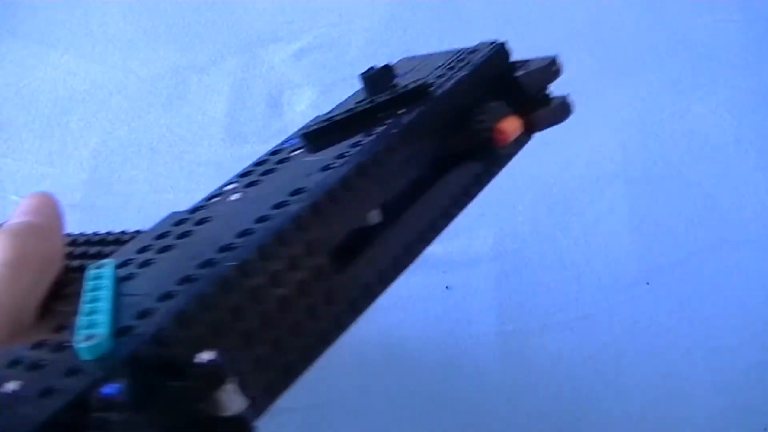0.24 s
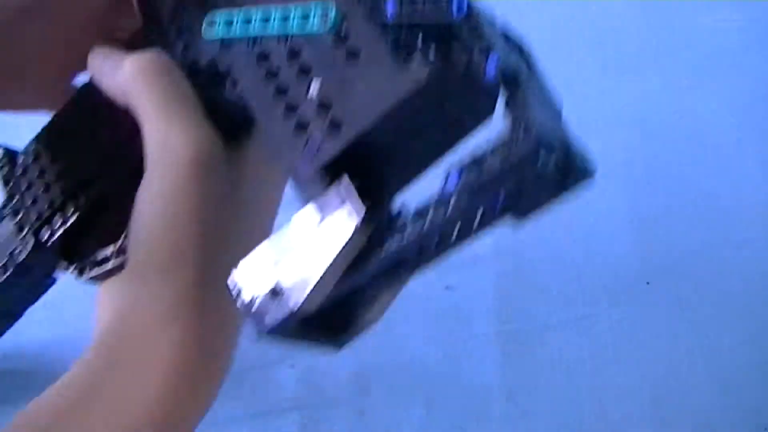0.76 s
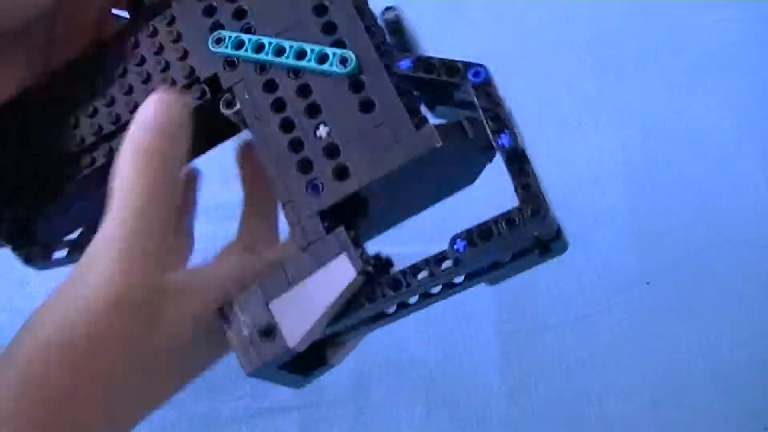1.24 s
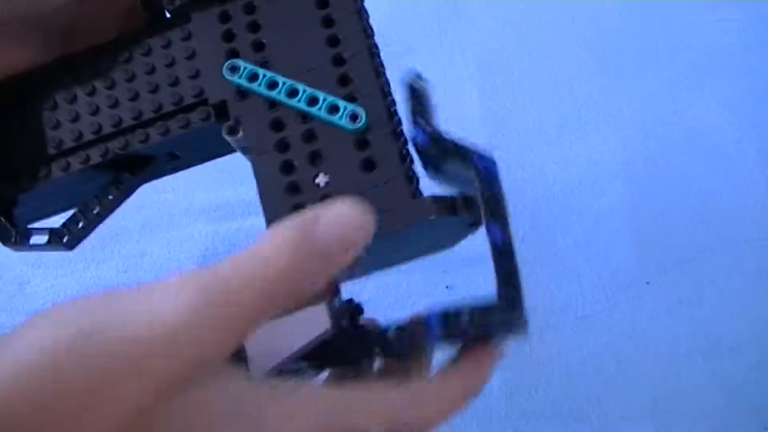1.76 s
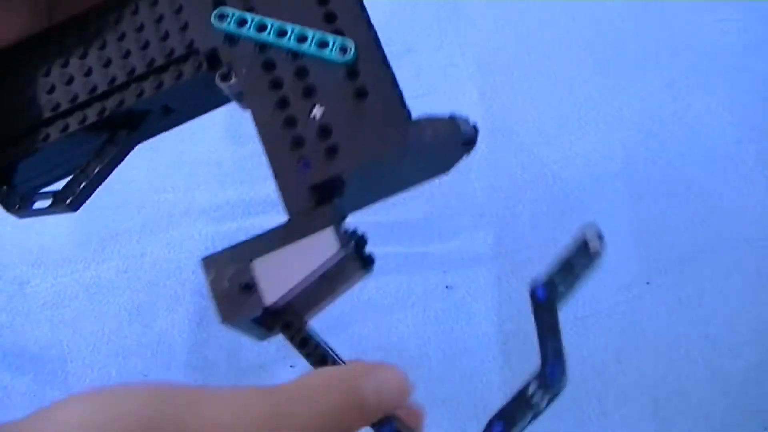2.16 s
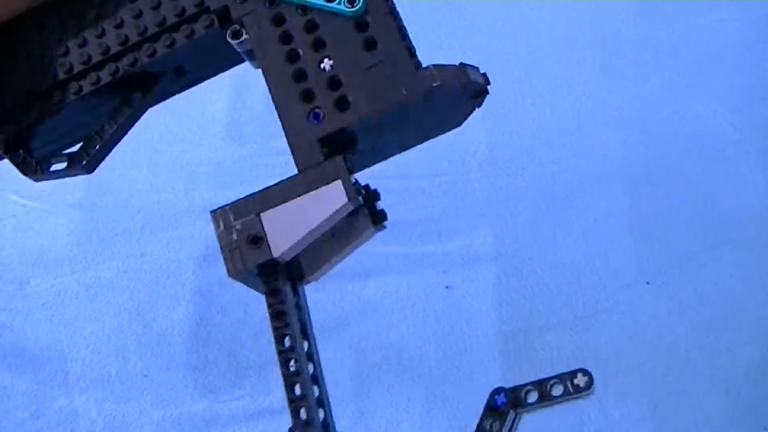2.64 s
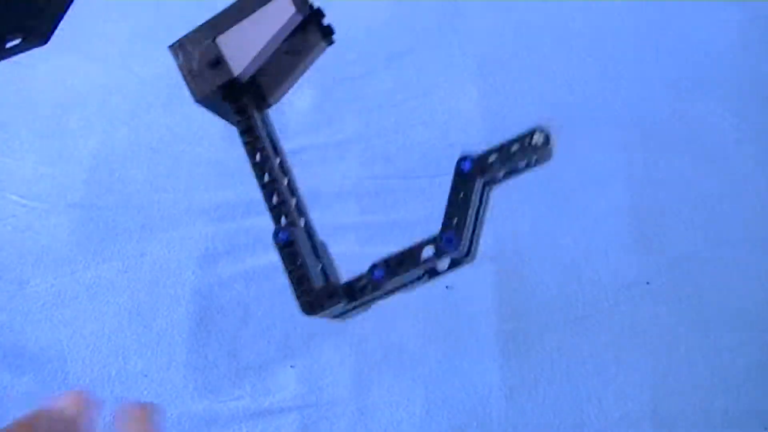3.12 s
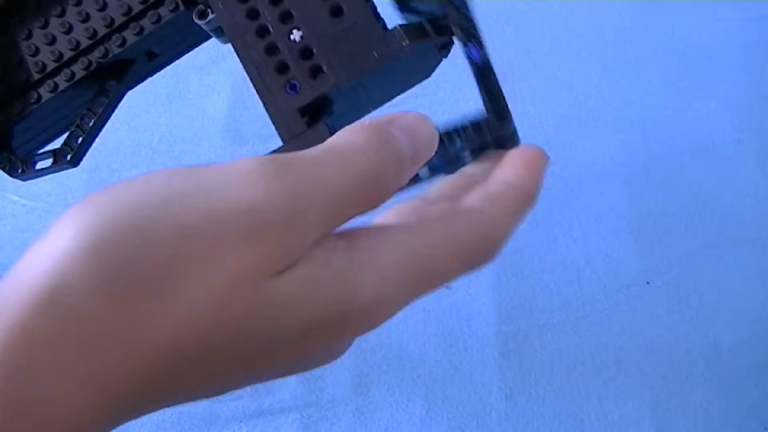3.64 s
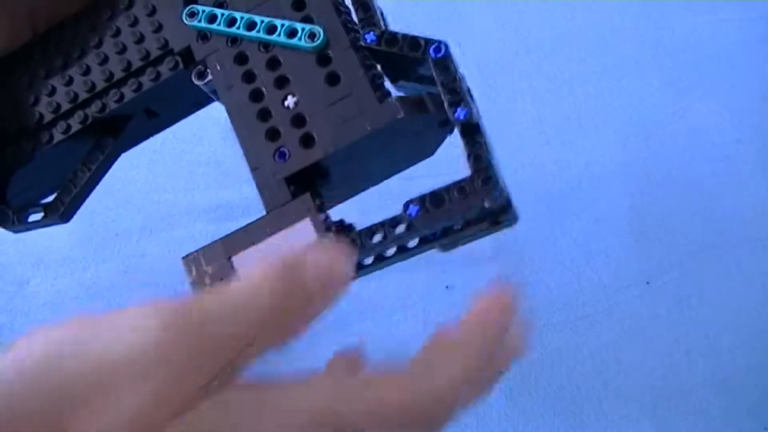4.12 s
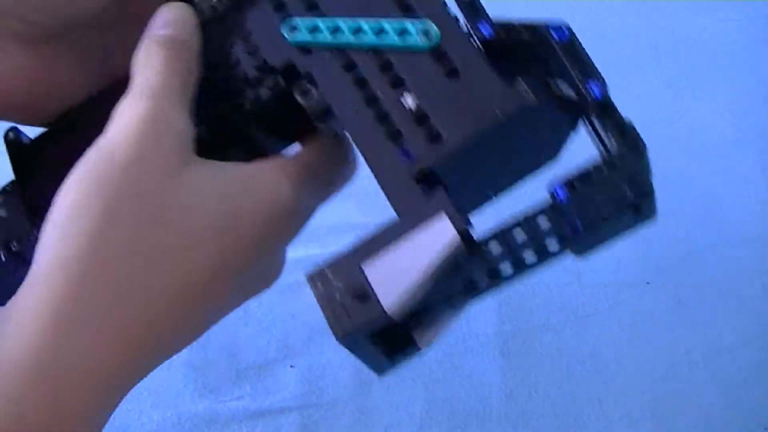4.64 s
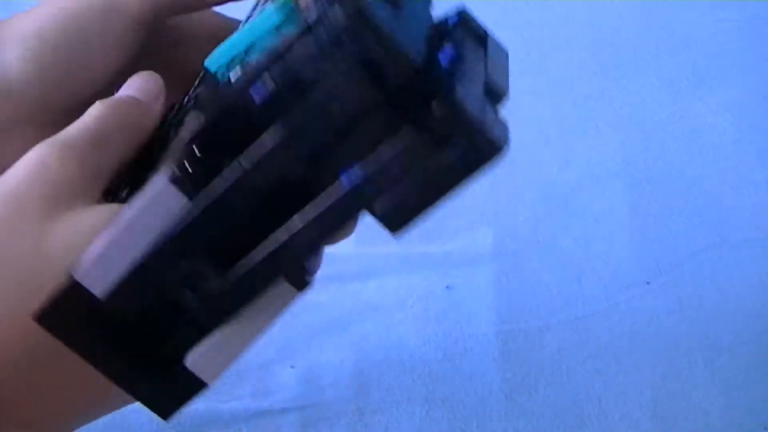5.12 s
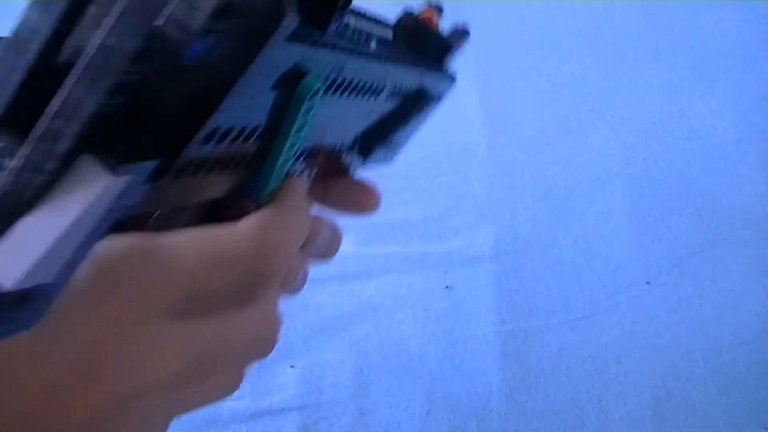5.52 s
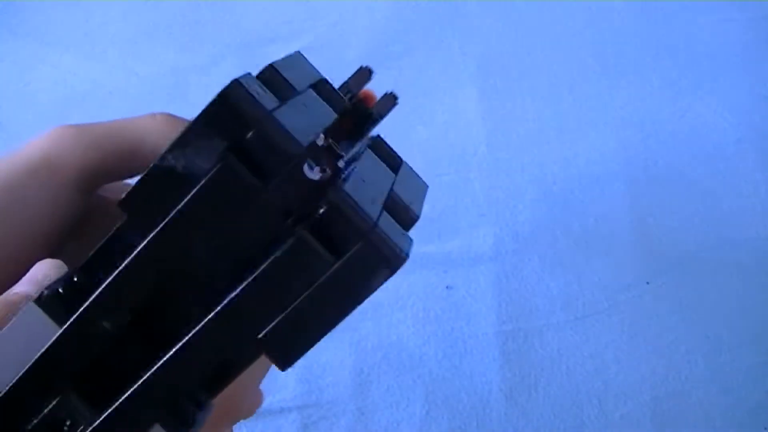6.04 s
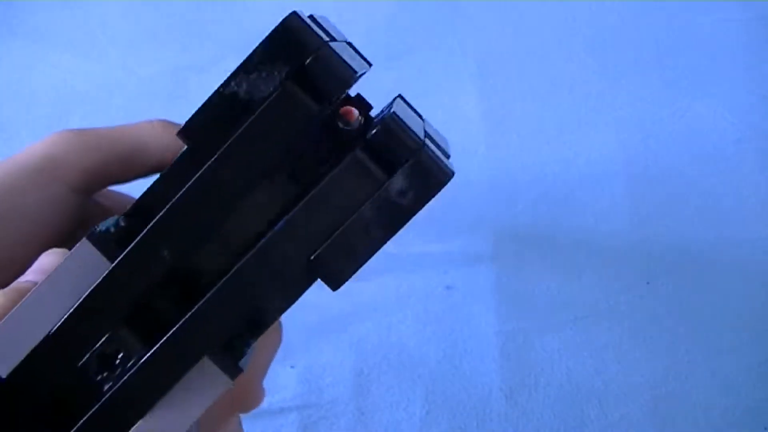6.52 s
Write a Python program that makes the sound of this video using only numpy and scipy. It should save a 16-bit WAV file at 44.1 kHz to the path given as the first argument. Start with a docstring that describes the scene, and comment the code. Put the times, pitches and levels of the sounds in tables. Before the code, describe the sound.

Plastic toy bricks click and rattle irregularly as a built model is turned in the hands, with soft finger rubbing in a quiet room.

```python
"""A quiet room: a model of plastic bricks is turned over in the hands, close to a small microphone.
Loose bricks and a hinged arm knock, ringing shell, beams, studs and edges; the joints rattle and creak,
and the model recoils with a dull thump under heavy knocks. Fingers slide over the studs in dense
friction grains. The room hisses; a distant cricket trills now and then with its wings."""
import sys
import numpy as np
from scipy import signal
from scipy.fft import rfft, irfft
from scipy.io import wavfile

SR = 44100
rng = np.random.default_rng(int(sys.argv[2]) if len(sys.argv) > 2 else 0)


def dump_mix(stems):
    """Bounce the given channels to the path in sys.argv[1] as a 16-bit WAV at rate SR."""
    frames = np.atleast_2d(stems).T  # one column per channel
    limited = np.clip(frames, -1, 1)  # hard clip at full scale
    pcm = np.round(limited * 32767).astype(np.int16)
    wavfile.write(sys.argv[1], SR, pcm)


N = 298557

# knocks: t/s, body level/dB, tick level/dB, loose brick f/Hz, chatter decay/ms
KNOCKS = [(0.0094, -28.5, -42, 1400, 3.4), (0.0202, -36, -40, 1900, 2.1), (0.7098, -36, -44.5, 1580, 2.6),
          (0.839, -29, -34, 2420, 1.4), (0.8558, -28, -38, 1440, 2), (0.885, -40, -43.5, 1920, 1.9),
          (0.9113, -32, -46, 1700, 1.9), (0.9278, -31.5, -57, 2007, 1.1), (1.0306, -16, -28.5, 1816, 1.9),
          (1.0405, -25.5, -29, 1270, 2.4), (1.0528, -20.5, -20, 2240, 5.7), (1.057, -15, -19.5, 2440, 1.5),
          (1.1025, -11, -13.5, 1260, 1.4), (1.1332, -29.5, -55, 1440, 1.9), (1.206, -33, -56, 1120, 1.7),
          (1.2358, -26, -44.5, 1170, 2.1), (1.289, -19.5, -25.5, 2270, 3.1), (1.302, -38, -44, 1520, 1.9),
          (1.3213, -24.5, -32, 1970, 2.5), (1.3389, -21.5, -18, 2410, 3.8), (1.3444, -18, -20.5, 2440, 2),
          (1.3601, -20, -29, 1100, 1.4), (1.376, -17.5, -34, 3030, 3.3), (1.4205, -19, -39, 1304, 1.3),
          (1.4547, -47, -39.5, 1970, 2.1), (1.4959, -40, -32.5, 1130, 1.9), (1.516, -18, -36.5, 1600, 2.7),
          (1.5454, -44, -36, 2130, 1.7), (1.5562, -22, -39.5, 1256, 1.6), (1.5673, -54, -36.5, 1320, 2.1),
          (1.5864, -47, -42.5, 1650, 1.9), (1.7456, -32.5, -53, 1320, 2.3), (1.8554, -37, -28, 3450, 1.6),
          (1.9024, -22.5, -31, 2520, 4), (1.9192, -25, -49, 1310, 1.9), (2.0447, -29, -39, 2940, 3.5),
          (2.0742, -41, -45, 1360, 1.9), (2.1036, -46, -40, 3670, 2.1), (2.1276, -28, -43, 2080, 1.9),
          (2.136, -20, -25.5, 2019, 2.6), (2.142, -15, -20.5, 2800, 2.5), (2.1562, -25, -40, 2780, 2.2),
          (2.4167, -31, -32, 3330, 3.3), (2.425, -26.5, -22.5, 3860, 2.6), (2.4427, -51, -33, 3700, 1.9),
          (2.5342, -28, -51, 1330, 1.5), (3.4294, -35, -38, 2400, 1.5), (3.6599, -17, -21, 1930, 3.2),
          (3.6636, -16, -43, 2496, 1.7), (3.67, -16, -35, 2700, 1.1), (3.7172, -35, -45, 1130, 3.3),
          (3.7237, -25, -51, 1200, 2.4), (3.7315, -27, -49, 1110, 2.6), (3.8337, -26.5, -38.5, 2870, 1.3),
          (3.8354, -24.5, -38.5, 2500, 3.8), (3.9994, -36, -37.5, 2560, 2.3),
          (4.1819, -35, -37.5, 2700, 2.4), (4.2364, -42.5, -58, 1150, 2.4), (4.5211, -39.5, -52, 1430, 1.6),
          (4.575, -42, -56, 1490, 1.9), (4.6138, -30, -52, 1290, 2.7), (4.6488, -41, -55, 1390, 2.1),
          (4.6868, -40.5, -52.5, 1970, 2.1), (4.7038, -39, -58, 1400, 1.9), (4.8042, -40, -58, 1390, 1.9),
          (4.8244, -26.5, -37.5, 2270, 1.9), (4.8391, -20.5, -46, 1280, 1.7), (4.9576, -47, -59, 1960, 1.9),
          (4.9755, -34.5, -58, 1370, 0.86), (5.0574, -23.5, -40.5, 1988, 2.5),
          (5.1654, -26, -40, 1430, 1.9), (5.2398, -42.5, -48, 2090, 1.9), (5.463, -38, -44, 2340, 3.8),
          (5.4964, -28.5, -48, 1030, 1.1), (5.5314, -33.5, -65, 1370, 1.9), (5.7912, -24.5, -36, 1597, 1.9),
          (5.8008, -43, -58, 1510, 1.9), (5.821, -54, -40, 1320, 1.9)]
# modes of the model's parts: f/Hz, bandwidth/Hz, level/dB
SHELL_MODES = [(1040, 224, -8), (1226, 125, -12), (1255, 180, -6), (1566, 325, -3)]
BEAM_MODES = [(1816, 220, -49), (2011, 140, -6.3), (2484, 330, -1.5), (2630, 780, 8.5), (2710, 440, 3),
              (3480, 144, -12.5), (3540, 210, -15)]
STUD_MODES = [(4460, 1280, -1.4), (5570, 1370, -0.059), (7130, 1270, -0.16)]


def from_db(db):
    return 10 ** (np.asarray(db) / 20)


def unit_rms(x):
    return x / np.sqrt(np.mean(x ** 2) + 1e-20)


def at_hz(points, hz):
    points_hz, values = np.transpose(points)
    return np.interp(np.log(hz), np.log(points_hz), values)


def coloured(white, spectrum):
    """White signal shaped to a spectrum; rms 1."""
    hz = np.maximum(np.fft.rfftfreq(len(white), 1 / SR), 10)
    return unit_rms(irfft(rfft(white) * from_db(at_hz(spectrum, hz)), len(white)))


def drift(rate_hz):
    """Slow random wander; rms 1."""
    r = np.exp(-2 * np.pi * rate_hz / SR)
    return unit_rms(signal.lfilter([1], [1, -2 * r, r * r], rng.standard_normal(N + SR))[SR:])


def swells(rows):
    """Sum of half-cosine rises and falls."""
    t = np.arange(N) / SR
    return sum(from_db(db) * np.cos(np.pi * np.clip((t - middle_s) / length_s, -.5, .5))
               for middle_s, length_s, db in rows)


def finger_rub():
    """Skin on studs: dense friction grains; each slide has its own level and brightness."""
    # slides: t/s, level/dB, treble gain/dB
    slides = [(0, -47, -6.5), (.07, -49.5, -3.5), (.14, -40.5, -5), (.23, -41, -6.5), (.3, -51.5, 1),
              (.5, -57.5, -3), (.95, -57, 1.5), (1.25, -48, -5.5), (1.62, -58.5, -0.5), (2.08, -54.5, -12),
              (2.3, -56.5, 0.3), (2.5, -53.5, 4.5), (2.75, -62.5, -14), (3.27, -67, 6.5), (3.5, -54.5, 1),
              (3.95, -65, 0.5), (4.5, -64, 2), (4.65, -57, -5), (5.35, -66, -1), (5.62, -63.5, 10),
              (6.77, -67.5, -7)]
    # friction spectrum: f/Hz, level/dB
    spectrum = [(120, -43), (200, -14), (330, -11.5), (479, -4.5), (554, -7), (812, -5), (890, -5),
                (1510, -4.5), (1910, -2.5), (10200, -13), (15500, -26)]
    times_s, *curves = np.transpose(slides)
    rub_db, treble_db = [np.interp(np.arange(N) / SR, times_s, curve) for curve in curves]
    grains = rng.standard_normal(N) * from_db(1.2 * np.minimum(rng.exponential(1, N), 5))
    rub = coloured(grains, spectrum) * from_db(1.8 * drift(25))
    dull = signal.sosfilt(signal.butter(2, 3800, fs=SR, output="sos"), rub)
    return from_db(rub_db) * (dull + from_db(treble_db) * (rub - dull))


def room_hiss():
    """Background noise, wavering slightly in level."""
    # noise spectrum: f/Hz, level/dB
    spectrum = [(7.1, 15.5), (12, 6), (19, -49), (32, -29), (65, -14.5), (150, -8), (369, -2), (514, -2.5),
                (759, -3), (1120, -3.5), (1610, -5), (3030, -8), (6410, -9.5), (15800, -17.5)]
    return from_db(-58.5 + 0.76 * drift(4.5)) * coloured(rng.standard_normal(N), spectrum)


def cricket():
    """Nearly pure wing tone in steady pulses, wavering with the air between."""
    # trills: middle t/s, length/s, level/dB
    trills = [(.1, .8, -74), (5.68, .5, -70), (6.55, .7, -72)]
    wing_hz, pulse_hz, first_pulse_s, rest_db = 3210, 25.05, 0.015, -77
    t = np.arange(N) / SR
    pulses = np.maximum(np.cos(2 * np.pi * pulse_hz * (t - first_pulse_s)), 0) ** 0.45
    tone = np.sin(2 * np.pi * wing_hz * t + 1.8 * drift(25))
    return (from_db(rest_db) + swells(trills)) * from_db(2.0 * drift(24)) * unit_rms(pulses * tone)


def struck(modes, t, spread_db, detune):
    """Damped sines of random strength, detuned as the grip changes; energy set by mean bandwidth."""
    hz, width_hz, level_db = np.transpose(modes)[:, :, None]
    pitch_draw, level_draw = rng.standard_normal((2, len(modes), 1))
    rings = np.sin(2 * np.pi * hz * (1 + detune * pitch_draw) * t) * np.exp(-np.pi * width_hz * t)
    signs = (-1) ** np.arange(len(modes))[:, None]   # neighbouring modes in antiphase
    sound = np.sum(signs * from_db(level_db + spread_db * level_draw) * rings, axis=0)
    return sound / np.sqrt(np.sum(sound ** 2) * 2 * np.pi * np.mean(width_hz) / SR)


def shares_db(lean_db):
    """One blow's energy split between two parts; lean_db favours the second."""
    second = 1 / (1 + from_db(-2 * lean_db))
    return 10 * np.log10([1 - second + 1e-9, second])


def chatter(t, decay_ms):
    """Contacts of one knock: grazing start, one firm touch, fading rebounds."""
    graze_s, firm_touch_s = 0.00078, 0.0007
    contacts = rng.standard_normal(len(t)) * (rng.random(len(t)) < .2)
    contacts *= np.clip(t / graze_s, .3, 1) * np.exp(-t * 1000 / max(decay_ms, .2))
    contacts[round(firm_touch_s * SR)] = 1.67
    return contacts


def knocks():
    """Blows ring shell, beams, studs and edges. Rows: chatter to the microphone, whole blow to walls."""
    # brick edge modes: f/Hz, bandwidth/Hz, level/dB
    edge_modes = [(8720, 1100, -3.5), (9370, 2200, -1.5), (10960, 950, -9.5), (11950, 1950, -6.5),
                  (12900, 2300, -13.5), (16100, 2700, -20)]
    split_hz, lean_db_per_octave, crest_db, even_tick_db = 1710, 14.5, 11.5, -4
    out, t = np.zeros((2, N + SR)), np.arange(round(.06 * SR)) / SR
    for start_s, body_db, tick_db, brick_hz, chatter_ms in KNOCKS:
        contacts = chatter(t, chatter_ms)
        # a loose brick adds its mode: low ones to the hollow shell, high ones to the beams
        brick = [(brick_hz, 230, 3.0)]
        if brick_hz < BEAM_MODES[0][0]:
            shell, beams = sorted(SHELL_MODES + brick), BEAM_MODES
        else:
            shell, beams = SHELL_MODES, sorted(BEAM_MODES + brick)
        shell_db, beams_db = body_db + shares_db(lean_db_per_octave * np.log2(brick_hz / split_hz))
        # more tick for its body: the knock lands more on an edge than on studs
        studs_db, edges_db = tick_db + crest_db + shares_db(0.42 * (tick_db - body_db - even_tick_db))
        at = round(start_s * SR)
        for part_db, ring in ((shell_db, struck(shell, t, spread_db=4.5, detune=0.0087)),
                              (beams_db, struck(beams, t, spread_db=2.0, detune=0.035)),
                              (studs_db, struck(STUD_MODES, t, spread_db=2.5, detune=0.025)),
                              (edges_db, struck(edge_modes, t, spread_db=7.5, detune=0.027))):
            hit = signal.fftconvolve(contacts, ring)[:len(t)]
            hit *= np.sqrt(np.sum(ring ** 2) / np.sum(hit ** 2 + 1e-18))   # keeps one blow's energy
            out[:, at:at + len(t)] += from_db(part_db) * np.array([hit, ring])
    # small light parts radiate little bass
    return signal.sosfilt(signal.butter(4, 880, "high", fs=SR, output="sos"), out[:, :N])


def joint_shake():
    """Rattle envelope: joints settle after each knock and creak as the frame flexes."""
    # creaks: middle t/s, length/s, level/dB
    creaks = [(.88, 0.082, -51), (.98, 0.17, -57.5), (1.16, .1, -60), (1.24, 0.079, -58), (2.5, 0.17, -60),
              (3.76, 0.061, -56), (3.88, 0.062, -56), (4.63, 0.15, -58), (5.0, 0.11, -57.5),
              (5.55, .15, -64)]
    rest_db, shaken_db, settle_s = -78, -25, 0.013
    blows = np.zeros(N)
    for start_s, body_db, *_ in KNOCKS:
        blows[round(start_s * SR)] = from_db(2 * (body_db + shaken_db))
    power = signal.lfilter([1], [1, -np.exp(-1 / (settle_s * SR))], blows + 1e-18)
    return np.sqrt(power + swells(creaks) ** 2 + from_db(2 * rest_db))


def joint_rattle():
    """Joints and loose pins tick densely, ringing shell, beams and studs."""
    ticks_per_s, tilt_db_per_octave = 1300, -6.0
    ticks = (rng.random(N) < ticks_per_s / SR) * rng.standard_normal(N)
    ticks *= from_db(2.4 * np.minimum(rng.exponential(1, N), 5))
    out = 0
    for hz, width_hz, level_db in SHELL_MODES[1:] + BEAM_MODES + STUD_MODES:
        r, w = np.exp(-np.pi * width_hz / SR), 2 * np.pi * hz / SR
        drive = ticks * rng.standard_normal(N)   # each tick catches each mode differently
        gain = from_db(level_db + tilt_db_per_octave * np.log2(hz / 1500))
        out = out + gain * signal.lfilter([1, 0, -1], [1, -2 * r * np.cos(w), r * r], drive + 1e-18)
    return joint_shake() * unit_rms(out)


def recoil_thumps():
    """The model recoils in the hand under heavy knocks: a few dull cycles."""
    # recoils: t/s, peak level/dB, f/Hz
    recoils = [(0.837, -54, 441), (1.029, -41.5, 468), (1.1, -51, 340), (1.901, -52, 377),
               (2.136, -50, 474), (2.144, -43.5, 430), (3.662, -42, 465), (3.672, -44, 452),
               (3.835, -50, 560)]
    width_hz = 270
    out, t = np.zeros(N + SR), np.arange(round(.06 * SR)) / SR
    window = np.sin(np.pi * np.clip(t * width_hz / 2, 0, 1)) ** 2
    for start_s, peak_db, hz in recoils:
        at = round(start_s * SR)
        out[at:at + len(t)] += from_db(peak_db) * np.sin(2 * np.pi * hz * t) * window
    return out[:N]


def room_reverb(x):
    """Diffuse reflections: a noise tail decaying in half-octave bands."""
    # room decay: f/Hz, T60/s
    decay_times = [(300, 0.13), (1300, 0.15), (3500, 0.15), (9000, 0.099), (15000, 0.017)]
    build_up_s = 0.0066
    t = np.arange(round(.35 * SR)) / SR
    edges_hz, tail = 250 * 2 ** np.arange(0, 6.1, .5), 0
    for low_hz, high_hz in zip(edges_hz, edges_hz[1:]):
        bandpass = signal.butter(2, [low_hz, high_hz], "band", fs=SR, output="sos")
        band = signal.sosfilt(bandpass, rng.standard_normal(len(t)))
        t60_s = at_hz(decay_times, np.sqrt(low_hz * high_hz))
        tail = tail + band * from_db(-60 * t / t60_s)
    tail *= np.clip(t / build_up_s, 0, 1)
    return signal.fftconvolve(x, tail / np.sqrt(np.sum(tail ** 2)))[:N]


def scene():
    """Mono mix; only knocks, thumps and joints feed the reverb."""
    near, to_walls = knocks() + recoil_thumps()
    joints = joint_rattle()
    hiss = room_hiss()
    reflections = from_db(-10.5) * room_reverb(to_walls + joints)
    return (near + joints + reflections + finger_rub() + cricket() + hiss)[None]


def record(dry):
    """Steep low-pass."""
    stop_db, stop_hz = 70, 17000
    return signal.sosfilt(signal.cheby2(12, stop_db, stop_hz, fs=SR, output="sos"), dry)


dry = scene()
out = record(dry)
dump_mix(out)
```